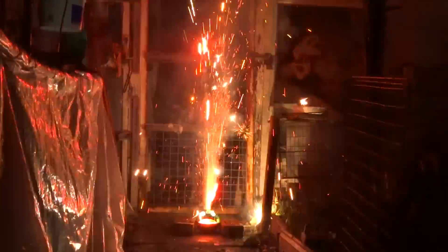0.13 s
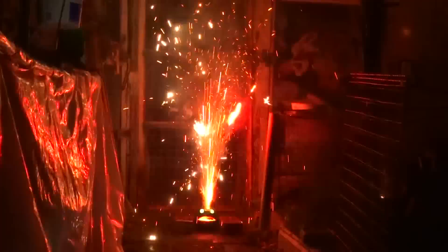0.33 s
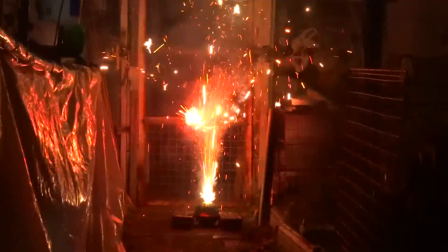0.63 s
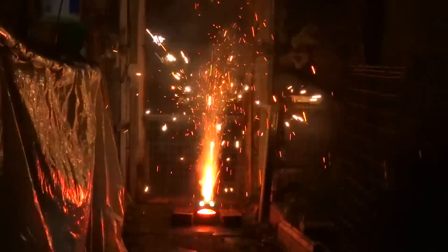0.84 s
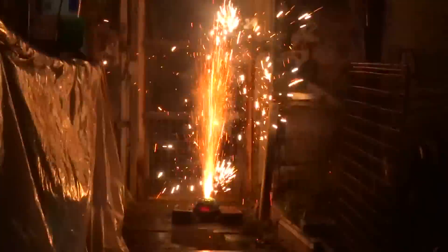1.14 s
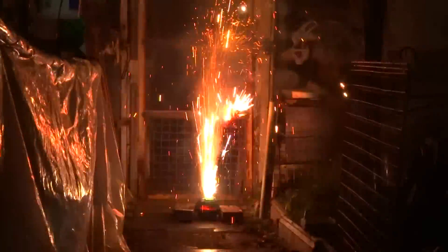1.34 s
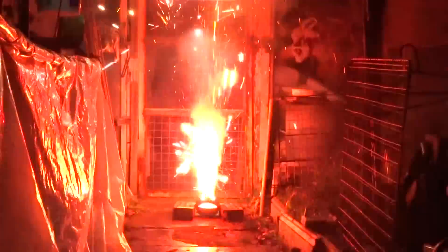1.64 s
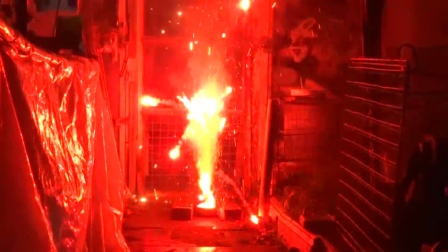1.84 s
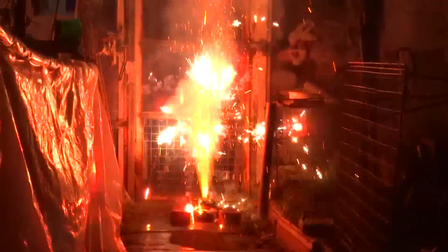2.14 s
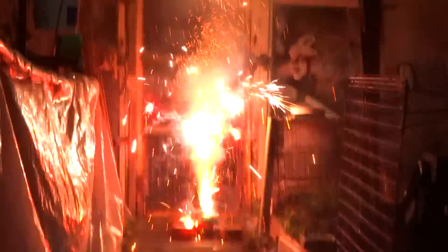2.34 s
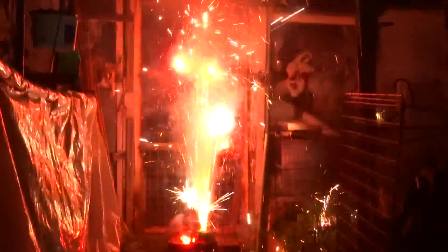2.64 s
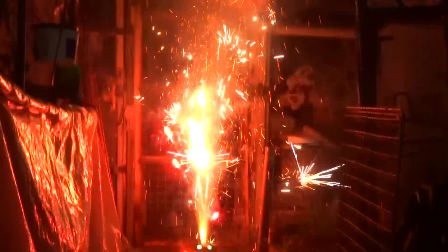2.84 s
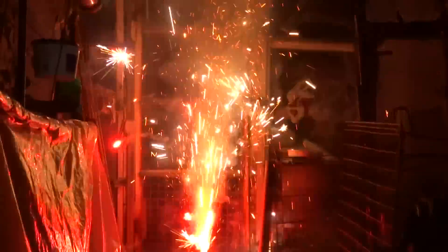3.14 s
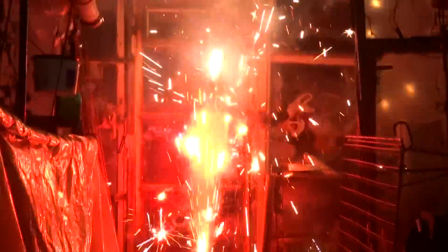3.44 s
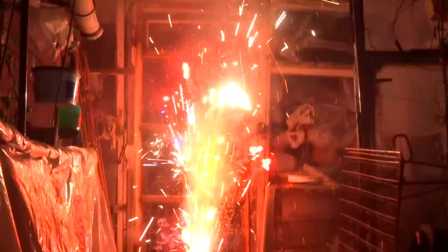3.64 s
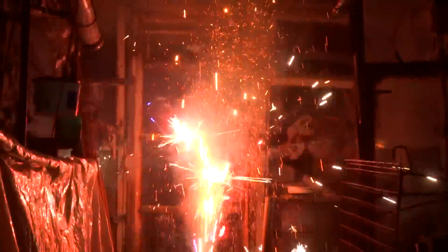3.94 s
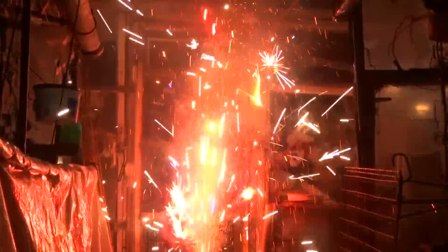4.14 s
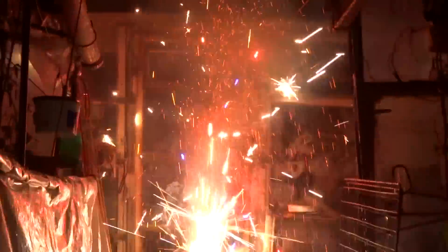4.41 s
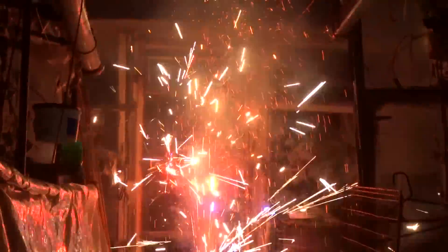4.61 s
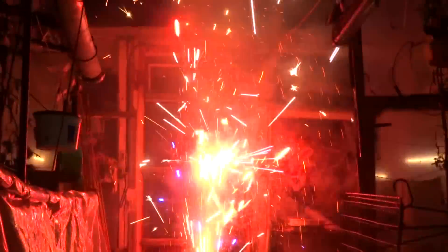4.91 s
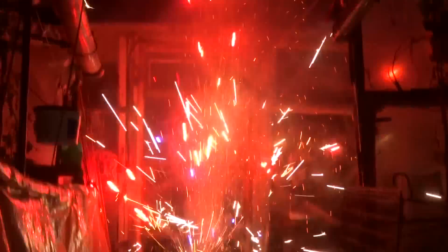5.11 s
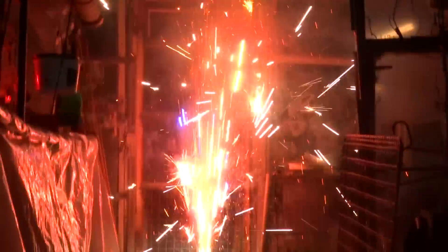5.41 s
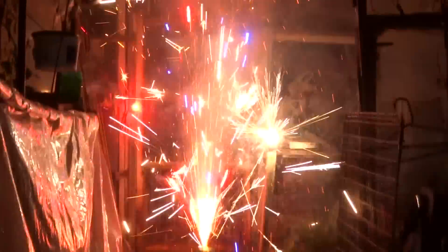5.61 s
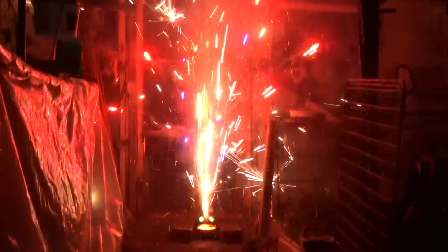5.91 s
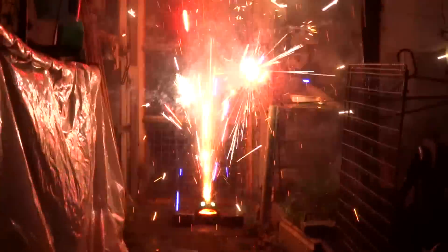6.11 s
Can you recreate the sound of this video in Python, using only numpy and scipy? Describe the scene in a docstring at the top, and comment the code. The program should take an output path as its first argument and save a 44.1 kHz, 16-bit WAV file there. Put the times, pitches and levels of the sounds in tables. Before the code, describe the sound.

A firework fountain first rushes and hisses quietly in gusts, with small spitting puffs and a swell of fizzing metal dust. Then crackling takes over: single snaps, a few tiny chirps, and soon a continuous rattle of fierce pops and bursting clusters, far louder than the jet. Hard nearby walls throw back each crack in a brief, bright ring. The sound is central, with only the treble spreading slightly.

```python
"""A small walled yard at night, where a ground fountain firework burns.
Its nozzle roars, hisses and sputters: gusting noise, tinted by the walls, with short puffs on top.
Then crackling stars burst in the spray, as hard spikes and dying clusters of pops over a growing bed.
Hollow puffs of band noise, a few chirping sparks and, under some bursts and pops, faint low thuds join in.
The walls throw every crack back, and a limiter ducks just ahead of the loudest."""
import sys
import numpy as np
from scipy import signal
from scipy.fft import rfft, irfft
from scipy.io import wavfile
from scipy.ndimage import uniform_filter1d, minimum_filter1d

SR = 44100
rng = np.random.default_rng(int(sys.argv[2]) if len(sys.argv) > 2 else 0)


def unload_wav(signal):
    """Save mono or channel-first audio to the path in sys.argv[1] as 16-bit WAV at rate SR, clipped to [-1, 1]."""
    wavfile.write(
        sys.argv[1],
        SR,
        np.round(np.clip(np.atleast_2d(signal).T, -1, 1) * 32767).astype(np.int16),
    )


N = 276066
T = np.arange(N) / SR


def amp(db):
    """Decibels to gain."""
    return 10 ** (np.asarray(db) / 20)


def unit(x):
    """Scales to an rms of one."""
    return x / np.sqrt(np.mean(x ** 2) + 1e-20)


def read(points, hz):
    """Reads a spectrum on a log-frequency axis."""
    f, value = np.transpose(points)
    return np.interp(np.log(hz + 1), np.log(f), value)


def level(curve):
    """Gain over time from rows of (time [s], level [dB])."""
    return amp(np.interp(T, *np.transpose(curve)))


def ramp(start_s, length_s):
    """Rises from zero to one, then holds."""
    return np.clip((T - start_s) / length_s, 0, 1)


def add(mix, s, sound):
    """Mixes a sound in at a time, cut off at the end of the mix."""
    start = max(round(s * SR), 0)
    part = mix[..., start:][..., :sound.shape[-1]]
    part += sound[..., :part.shape[-1]]


def wander(rate_hz):
    """Random drift of rms one, from a tenth of a rate up to about that rate."""
    hz = np.fft.rfftfreq(N, 1 / SR)
    band = (hz > rate_hz / 10) / (1 + (hz / rate_hz) ** 4)
    return unit(irfft(rfft(rng.standard_normal(N)) * band, N))


def resonate(x, hz, width_hz):
    """A resonance of gain one that follows a pitch curve: shift down, smooth, shift back up."""
    turn = np.exp(2j * np.pi * np.cumsum(hz) / SR)
    r = np.exp(-np.pi * width_hz / SR)
    return 2 * (turn * signal.lfilter([1 - r], [1, -r], x / turn)).real


# Bands that the walls strengthen or cancel, each sound taking a share of the pattern:
# (frequency [Hz], width [Hz], full lift or cut [dB])
WALL_BANDS = [(284, 36, 10.5), (476.5, 38.6, 11.5), (615, 36, 7), (760, 34, 5.5), (852, 47, 10),
              (991, 82, 12.5), (1034, 175, -11.5), (1165, 37, 5.5), (1363, 55, 11.5), (1410, 85, -11),
              (2097, 49, 4.5), (2185, 26, -26), (2330, 190, 0.5), (2560, 84, 1.5), (2650, 85, -3.5),
              (3230, 94, -11.5), (2836, 53, 4), (3024, 40, -5), (7040, 320, -1), (7700, 160, -8)]


def colour(x, tone, walls=0, size=4096):
    """Causal minimum-phase filter of unit energy: a spectrum plus a share of the wall pattern."""
    hz = abs(np.fft.fftfreq(size, 1 / SR))
    pattern_db = sum(db * np.exp(-2 * ((hz - f) / width) ** 2) for f, width, db in WALL_BANDS)
    log_gain = np.log(amp(read(tone, hz) + walls * pattern_db))
    taps = np.fft.ifft(np.exp(np.conj(signal.hilbert(log_gain)))).real[:size // 2]
    return signal.oaconvolve(x, taps[None] / np.linalg.norm(taps), axes=1)[:, :N]


# Ring of the yard: (frequency [Hz], time to fall by 60 dB [s])
YARD_RING = [(200, 0.65), (1000, 0.29), (4000, 0.32), (12000, 0.33)]


def yard(x, echo_db, tail_db, count=7):
    """Mid and side of a sound at one random spot: direct path, near walls, diffuse tail."""
    t = np.arange(SR // 2) / SR
    hz, when, z = signal.stft(rng.standard_normal((2, len(t))), SR, nperseg=256)
    decay = amp(-60 * when / read(YARD_RING, hz)[:, None])
    tail = signal.istft(z * decay, SR, nperseg=256)[1][:, :len(t)]
    tail = tail * (1 - np.exp(-t / 0.016))  # the diffuse tail swells in behind the direct sound
    paths = amp(tail_db) * tail / np.linalg.norm(tail[0])
    paths[:, 0] += [1, 2 * rng.random() - 1]
    jitter = 2 * rng.random((count, 2)) - 1
    for delay, (late, side) in zip(np.geomspace(.0011, .025, count), jitter):
        echo = amp(echo_db) * np.exp(-delay / 0.02) * np.array([[1], [2 * side]])
        add(paths, delay * 2 ** (late / 2), echo)
    return signal.oaconvolve(x[None], paths / np.linalg.norm(paths[0]), axes=1)[:, :N]


def turbulence(gust_db, flutter_db):
    """Mid and side noise that gusts and flutters as the powder burns unevenly."""
    swing_db = gust_db * wander(33.0) + flutter_db * wander(250)
    return unit(rng.standard_normal((2, N)) * amp(swing_db))


def combed(x, delay_s=0.00151, gain=0.46):
    """A surface close to the nozzle returns one inverted echo that combs the sound; rms one."""
    hz = np.fft.rfftfreq(N, 1 / SR)
    echo = gain * np.exp(-2j * np.pi * hz * delay_s)
    return unit(irfft(rfft(x) * (1 - echo), N))


# The crackling charge takes over
CHARGE_START_S, CHARGE_RISE_S = 1.66, 0.05
# Layers of the jet, relative to its thrust
ROAR_DB, RUSH_DB, SIZZLE_DB = 0.5, 2, -9
# A layer of metal dust burns through and lifts the sizzle
DUST_START_S, DUST_RISE_S, DUST_END_S, DUST_FALL_S, DUST_DB = 0.89, 0.23, 1.51, 0.45, 12.5
# The hollow of the roar shifts with the flame
HOLLOW_HZ, HOLLOW_WIDTH_HZ, HOLLOW_SWING_OCT, HOLLOW_DB = 567, 70, 0.2, 0.5
# Force of the gas jet, which drives roar, rush and sizzle: (time [s], level [dB])
JET_THRUST = [(0, -27), (.1, -32), (.155, -33.5), (.22, -28.5), (.26, -34), (.31, -27), (.39, -36),
              (.46, -39.5), (.53, -33.5), (.595, -28.5), (.68, -32), (.78, -34.5), (.84, -32.5),
              (.89, -28.5), (.96, -30), (1.13, -24), (1.21, -25), (1.33, -29), (1.41, -26.5), (1.52, -25),
              (1.61, -30.5), (1.8, -36.5), (2.0, -30), (2.11, -32.5), (2.34, -27), (2.47, -35), (2.76, -30),
              (2.87, -38), (2.97, -32.5), (3.5, -30), (3.8, -37.5), (6.25, -39)]
# Pinches of metal dust flare up in the young jet: (time [s], lift of the sizzle [dB], decay [s])
DUST_FLARES = [(.132, 13, 0.012), (.212, 6, 0.11), (.56, 5, .06), (.698, 6, 0.011)]
# Spectra of the three layers: (frequency [Hz], density [dB per Hz])
ROAR_SPECTRUM = [(25, -73), (70, -31), (140, -23), (200, -12.5), (280, -4), (400, -2.5), (580, 2),
                 (750, -7), (1100, -5), (2000, -13.5), (6000, -47)]
RUSH_SPECTRUM = [(150, -23.5), (700, -4), (1300, -1), (2400, 4.5), (3600, 0.5), (6000, 0), (8000, -11.5),
                 (11000, -9), (13000, -21)]  # also tints the hollow puffs
SIZZLE_SPECTRUM = [(600, -27), (4000, -18.5), (6000, -2), (7100, 1), (8500, -2.5), (11000, -2),
                   (12600, -17), (16000, -21)]


def jet():
    """Roar and rush of turbulent gas, and sizzling dust, all from the fixed nozzle."""
    gas = turbulence(gust_db=1.5, flutter_db=3.0)
    hollow_hz = HOLLOW_HZ * 2 ** (HOLLOW_SWING_OCT * wander(4.7))
    gas = gas + amp(HOLLOW_DB) * resonate(gas, hollow_hz, HOLLOW_WIDTH_HZ)
    roar = amp(ROAR_DB) * unit(colour(gas, ROAR_SPECTRUM, walls=0.59))

    rush = amp(RUSH_DB) * colour(turbulence(gust_db=1.06, flutter_db=1.0), RUSH_SPECTRUM, walls=1.2)

    dust = ramp(DUST_START_S, DUST_RISE_S) - ramp(DUST_END_S, DUST_FALL_S)
    flare_db = sum(db * (T > s) * np.exp(-abs(T - s) / decay) for s, db, decay in DUST_FLARES)
    hiss = combed(turbulence(gust_db=1.5, flutter_db=1.0))
    sizzle = amp(SIZZLE_DB + DUST_DB * dust + flare_db) * colour(hiss, SIZZLE_SPECTRUM, walls=0.4)

    # rush and sizzle give way slightly as the crackling charge takes over
    yielding = amp(-0.5 * ramp(CHARGE_START_S, CHARGE_RISE_S))
    return level(JET_THRUST) * (roar + (rush + sizzle) * yielding)


# The nozzle spits out a lump: (time [s], relative level [dB], decay [s])
SPIT_EVENTS = [(.027, -10, 0.0039), (.31, -26, 0.01), (.524, -16.5, 0.0052), (.633, -17, 0.011),
               (.693, -15.5, 0.0088), (.886, -16, 0.013), (.917, -13, 0.012), (1.447, -7, 0.0072),
               (1.574, -13, 0.0047), (2.155, -14, .007), (2.315, -14.5, 0.019), (2.787, -11.5, 0.0087),
               (3.236, -18, 0.047), (3.586, -6.5, 0.008), (3.964, -13, 0.0041), (4.005, -8, 0.0061),
               (4.1, -15.5, 0.0073), (4.436, -8.5, 0.0038), (4.638, -16, 0.0069), (4.865, -8.5, 0.0052),
               (4.935, -13, 0.0094), (5.306, -6, 0.0048), (5.823, -12.5, 0.0093)]
# Spectrum of a spit: (frequency [Hz], density [dB per Hz])
SPIT_SPECTRUM = [(40, -50), (150, -37), (300, -15), (570, -2.5), (800, -9.5), (1200, -16), (3000, -21.5),
                 (10000, -27), (16000, -39)]


def spits(size=6000):
    """Each lump leaves the nozzle with a short, hollow puff of decaying noise."""
    t, out = np.arange(size) / SR, np.zeros(N)
    for s, db, decay in SPIT_EVENTS:
        add(out, s, amp(db - 4.5) * np.exp(-t / decay) * rng.standard_normal(size))
    return colour(yard(out, echo_db=-13.0, tail_db=-13.5), SPIT_SPECTRUM, walls=0.6)


# Hollow puffs of band noise, some of them dull star bursts:
# (time [s], relative level [dB], length [s], middle pitch [Hz])
HOLLOW_PUFFS = [(0.608, -26, 0.042, 1120), (3.24, -24.5, 0.056, 836), (4.362, -28, .07, 780),
                (4.588, -28, 0.036, 1090), (4.728, -32, 0.019, 1110), (4.887, -27.5, 0.031, 980),
                (5.568, -28.5, 0.098, 766), (6.198, -32, 0.067, 730)]


def hollow_puffs(width_hz=400, sag=0.045):
    """Noise in a hollow resonant band that swells, sinks a little in pitch and fades."""
    out = np.zeros(N)
    for s, db, length, hz in HOLLOW_PUFFS:
        u = np.arange(0, 1, 1 / (length * SR))  # progress through the puff
        pitch = hz * (1 - sag * (u - .5))
        noise = rng.standard_normal(SR // 2)[:len(u)]
        hollow = resonate(resonate(noise, pitch, width_hz), pitch, 2 * width_hz)
        add(out, s, amp(db) * np.sin(np.pi * u) * unit(hollow))
    return amp(-1.5) * colour(yard(out, echo_db=-7, tail_db=-11), RUSH_SPECTRUM, walls=0.96)


def snap(x, swing=0.74, size=90):
    """Each crack swings the pressure down, then up, and leaves a brief ragged wake."""
    wake = 0.057 * rng.standard_normal(size) * np.exp(-np.arange(size) / SR / 0.00012)
    wake[0] = 1
    return signal.lfilter(np.convolve([-swing, 1], wake / np.linalg.norm(wake)), [1, -swing], x)


def crack(ragged, ragged_s, dull_hz, size=600, echo=0.82):
    """A star or spark splits: a hard spike, a ragged end and one close echo, of unit energy."""
    split = ragged * rng.choice([-1., 1.], size) * np.exp(-np.arange(size) / SR / ragged_s)
    split[0] = 1
    split[rng.integers(size // 30, size // 10)] += echo * rng.uniform(0.32, 1)
    split = signal.lfilter([1], [1, -np.exp(-2 * np.pi * dull_hz / SR)], split)
    return split / np.linalg.norm(split)


# Spectrum of a crack: (frequency [Hz], density [dB per Hz])
CRACK_SPECTRUM = [(30, -46), (130, -29), (250, -15), (500, -4.5), (900, -1.1), (1500, -1), (2700, 1.46),
                  (4500, -0.6), (8000, -1.5), (10900, 0.84), (12000, -7), (13200, -13), (16000, -15.5)]


def scattered(spots, echo_db, tail_db):
    """Cracks from several spots in the spray, each spot with its own echoes."""
    spread = sum(yard(snap(spot), echo_db, tail_db) for spot in spots)
    return colour(spread, CRACK_SPECTRUM, walls=0.12)


# Large stars bursting: (time [s], relative level [dB], life of the cluster of fragments [s])
STAR_BURSTS = [(1.591, -21, 0.051), (1.6695, -21.5, 0.12), (1.775, -21.5, 0.075), (2.014, -28, 0.02),
               (2.0515, -23.5, 0.011), (2.132, -28, .012), (2.2413, -25.5, 0.012), (2.301, -26.5, 0.12),
               (2.3648, -23.5, 0.1), (2.476, -19, 0.02), (2.5399, -18.5, 0.012), (2.5659, -20.5, 0.13),
               (2.681, -19.5, 0.067), (2.8277, -30, 0.015), (2.857, -24, 0.1), (3.042, -22, 0.073),
               (3.0736, -21.5, 0.026), (3.283, -19, 0.1), (3.4268, -27, 0.018), (3.458, -17, 0.037),
               (3.528, -27, 0.035), (3.5879, -22, 0.029), (3.6779, -23, 0.16), (3.753, -22.5, 0.031),
               (3.853, -17, 0.13), (3.9885, -24.5, 0.034), (4.0437, -20, 0.21), (4.13, -18.5, 0.058),
               (4.2573, -20, 0.16), (4.3883, -27, 0.05), (4.4773, -20, 0.14), (4.5123, -22, 0.11),
               (4.5819, -20, 0.029), (4.7328, -22.5, 0.035), (4.837, -22.5, 0.035), (4.8934, -20, 0.037),
               (4.9808, -20.5, 0.12), (5.1033, -20.5, 0.029), (5.233, -17.5, 0.067), (5.3069, -23.5, 0.012),
               (5.357, -18, 0.019), (5.3989, -20.5, 0.11), (5.4893, -22.5, 0.043), (5.5442, -17.5, 0.077),
               (5.6446, -20, 0.097), (5.7009, -21, 0.031), (5.796, -20.5, 0.023), (5.8899, -21, 0.033),
               (5.992, -19, 0.15), (6.1242, -18.5, 0.0095), (6.1486, -20.5, 0.061)]
# Single sparks that go off in one sharp pop: (time [s], relative level [dB])
SPARK_POPS = [(1.7439, -9), (1.8152, -22), (1.9411, -11.5), (2.1488, -13), (2.1629, -13), (2.174, -8.5),
              (2.2089, -12.5), (2.3899, -8), (2.4468, -5), (2.5179, -3), (2.627, 0), (2.6596, -3),
              (2.7327, -3), (2.7443, -6), (2.7627, 7), (2.7881, 3), (2.8417, -12), (2.899, -5),
              (2.9393, -2.5), (2.9911, -3), (3.0072, -14), (3.0298, -4), (3.0952, 4.5), (3.137, -1),
              (3.1844, -4), (3.2105, -6), (3.2396, -8), (3.4388, 6), (3.6076, -4), (3.63, 0), (3.6467, 0),
              (3.7004, 5), (3.7624, -6), (3.808, -3), (3.838, -3), (3.9239, 6.5), (4.0592, 9), (4.1428, 2),
              (4.2116, -11), (4.2334, -5), (4.3588, -8), (4.4004, 4), (4.4097, 8), (4.4637, -8),
              (4.6149, -3), (4.6577, 4), (4.714, -10), (4.7847, -9), (4.8098, -12), (4.8676, -1),
              (4.9224, -10), (4.9671, 5), (5.0055, 0.5), (5.116, -10), (5.1374, -8), (5.1855, -11),
              (5.4224, 1), (5.4341, -6), (5.4788, 4), (5.6715, 5), (5.7706, -14), (5.8234, 0), (5.8383, -6),
              (5.8588, -4), (5.9178, 1), (5.9476, -8), (6.0005, 6), (6.0695, -2), (6.1872, 3)]
# Lift of a report over the table level of its star, and of its single pop
REPORT_DB, POP_DB = 35, 8.5


def reports(count=8):
    """The hard cracks of large stars and single sparks, dealt in turn to spots in the spray."""
    spots = np.zeros((count, N))
    for k, (s, db, life) in enumerate(STAR_BURSTS):
        report = crack(ragged=0.091, ragged_s=0.0024, dull_hz=9200)
        add(spots[k % count], s, amp(REPORT_DB + db) * report)
    for k, (s, db) in enumerate(SPARK_POPS):
        pop = crack(ragged=0.12, ragged_s=0.002, dull_hz=8300)
        add(spots[k % count], s, amp(POP_DB + db) * pop)
    return amp(1.34) * scattered(spots, echo_db=-17, tail_db=-9.5)


def burst(life, rate=1500, spread_db=11, first_rush=0.23, first_rush_s=0.00097, size=12000):
    """The fragments of a star pop in a dying cluster, hardest just after the split."""
    t = np.arange(size) / SR
    chance, strength = rng.random((2, size))
    fade = np.exp(-t / life) + first_rush * np.exp(-t / first_rush_s)
    pops = (chance < rate / SR) * amp(spread_db * strength) * fade * (t > .001)
    energy = 0.66 * life * SR / 2  # a longer cluster holds more energy
    return pops / (np.linalg.norm(pops) + 1e-9) * np.sqrt(energy)


# The bed of small stars builds up, holds, then thins out
BED_START_S, BED_RISE_S, BED_END_S, BED_FALL_S = 2.1, 0.71, 4.75, 0.49
# Its starting level, relative to the clusters, and its two changes
BED_DB, BED_BUILD_DB, BED_THIN_DB, POPS_PER_S = -39.5, 13.5, -2.5, 1100


def crackle(count=6):
    """The fragments of the large stars pop over a bed of small ones."""
    build_db = BED_BUILD_DB * ramp(BED_START_S, BED_RISE_S)
    thin_db = BED_THIN_DB * ramp(BED_END_S, BED_FALL_S)
    bed = ramp(CHARGE_START_S, CHARGE_RISE_S) * amp(BED_DB + build_db + thin_db)
    strength_db = 4.7 * np.minimum(rng.exponential(1, N), 4)
    fragments = bed * unit((rng.random(N) < POPS_PER_S / SR) * amp(strength_db))
    for s, db, life in STAR_BURSTS:
        add(fragments, s, amp(db) * burst(max(life, .01)))
    where = rng.integers(0, count, N)  # every pop takes a random spot
    spots = [fragments * (where == k) for k in range(count)]
    return amp(0.48) * scattered(spots, echo_db=-8.5, tail_db=-5.0)


# Faint low thuds under some of the bursts and pops: (time [s], relative level [dB])
THUD_EVENTS = [(1.667, -20), (2.827, -28), (3.28, -25), (3.677, -19), (3.752, -25), (3.806, -29),
               (4.044, -20), (4.13, -28), (4.408, -34), (5.102, -27), (5.355, -21), (5.889, -31),
               (5.991, -30), (6.123, -27)]


def thuds(push_s=0.0014, size=2000):
    """A short push of air and the slower suction that follows it."""
    u, out = np.arange(size) / SR / push_s, np.zeros(N)
    for s, db in THUD_EVENTS:
        add(out, s, amp(db) * u * (1 - u / 2) * np.exp(-u))
    return yard(out, echo_db=-20, tail_db=-15)


# Sparks that chirp as they fly: (time [s], relative level [dB], starting pitch [Hz])
CHIRP_EVENTS = [(2.256, -9.5, 2166), (2.369, -13.5, 2450), (2.409, -10.5, 2270), (2.422, -20, 2330),
                (2.439, -11, 2310)]


def chirps(size=3000):
    """Brief rough whistles: wavering sines that fall slightly in pitch."""
    t, out = np.arange(size) / SR, np.zeros(N)
    swell = (1 - np.exp(-t / .0005)) * np.exp(-t / .0055)
    for s, db, hz in CHIRP_EVENTS:
        waver = unit(uniform_filter1d(rng.standard_normal(size), 24))
        turns = np.cumsum(hz * (1 + .06 * waver - 2 * t)) / SR
        add(out, s, amp(db) * np.sin(2 * np.pi * turns) * swell)
    return yard(out, echo_db=-23, tail_db=-6)


# Stereo width: (frequency [Hz], gain of the side signal [dB])
STEREO_WIDTH = [(250, -40), (500, -39), (1000, -27), (2000, -24.5), (4000, -16), (8000, -17), (13000, -10)]


def scene():
    """Everything stands nearly straight ahead; mainly the treble spreads."""
    mid, side = jet() + spits() + hollow_puffs() + reports() + crackle() + thuds() + chirps()
    side_gain = amp(read(STEREO_WIDTH, np.fft.rfftfreq(N, 1 / SR)))
    side = irfft(rfft(side) * side_gain, N)
    return np.array([mid + side, mid - side])


def record(dry, ceiling_db=-3, attack_db_per_s=4200, recovery_db_per_s=3000, size=36):
    """A limiter ducks just ahead of each peak and recovers quickly; then the top band is cut."""
    over_db = np.maximum(20 * np.log10(abs(dry).max(0) + 1e-9) - ceiling_db, 0)
    # running maxima draw straight slopes: backwards for the attack, forwards for the recovery
    ahead_db = np.maximum.accumulate((over_db - attack_db_per_s * T)[::-1])[::-1] + attack_db_per_s * T
    held_db = np.maximum.accumulate(ahead_db + recovery_db_per_s * T) - recovery_db_per_s * T
    gain_db = uniform_filter1d(minimum_filter1d(-held_db, size), size)
    edge = signal.firwin(511, 15900, window=("kaiser", 9), fs=SR)  # low-pass, cutoff in Hz
    return signal.oaconvolve(dry * amp(gain_db), edge[None], "same")


dry = scene()
out = record(dry)
unload_wav(out)
```